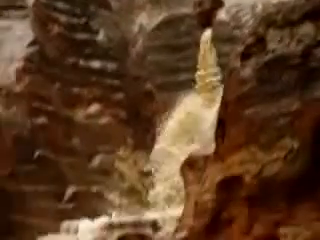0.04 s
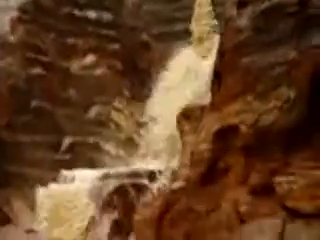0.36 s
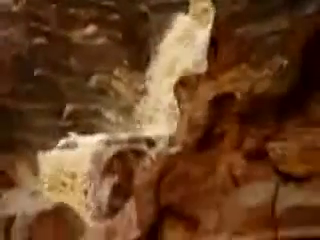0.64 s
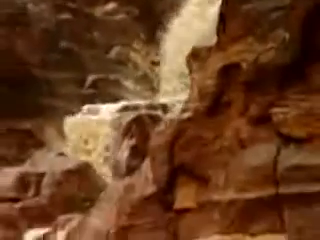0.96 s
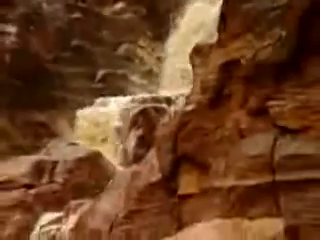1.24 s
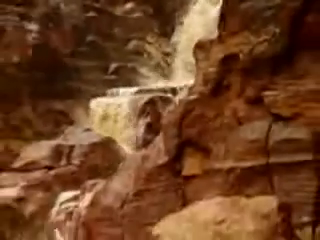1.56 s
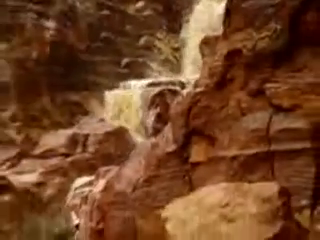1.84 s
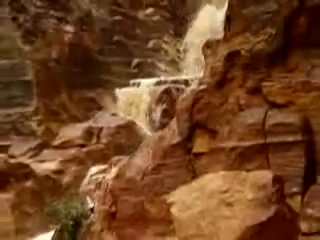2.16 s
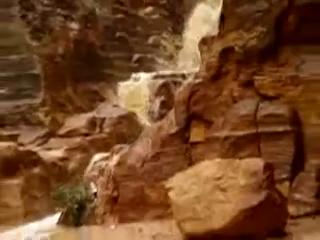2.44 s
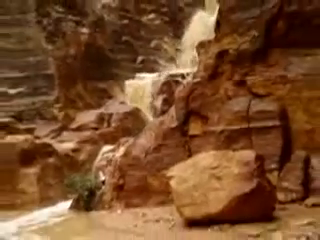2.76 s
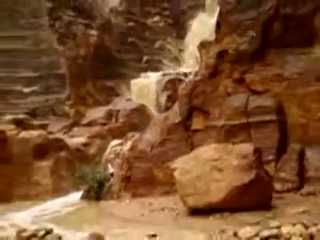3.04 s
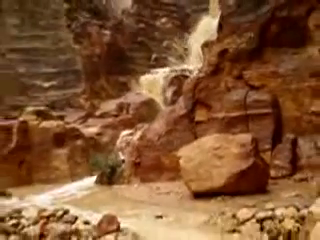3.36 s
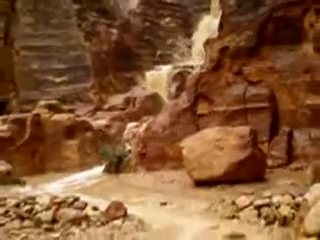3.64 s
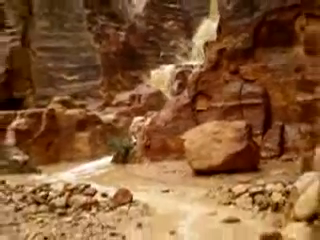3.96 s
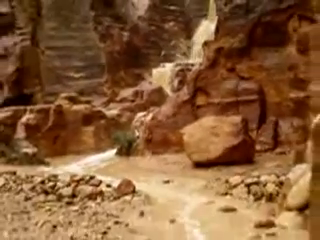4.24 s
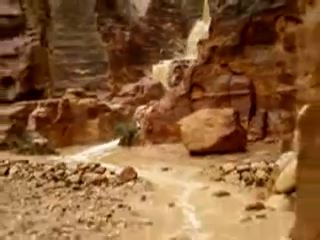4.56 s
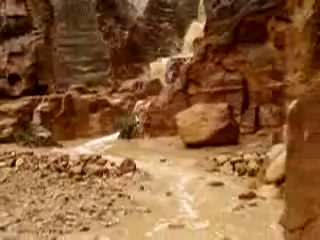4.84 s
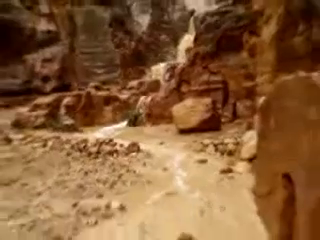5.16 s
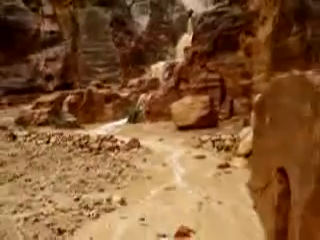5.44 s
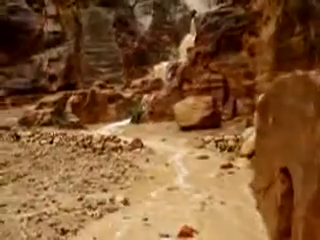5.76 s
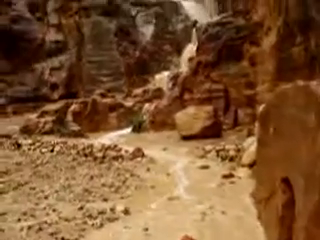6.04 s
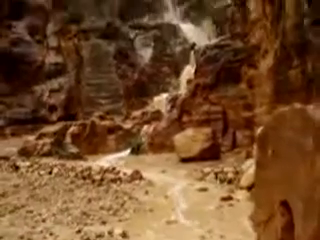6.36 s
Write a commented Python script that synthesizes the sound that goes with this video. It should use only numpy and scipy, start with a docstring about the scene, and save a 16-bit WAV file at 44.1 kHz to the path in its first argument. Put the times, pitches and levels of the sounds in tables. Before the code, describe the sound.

A muddy waterfall pours down a canyon cliff in a dense, steady roar, with softer bubbling and fizzing where it runs off over gravel. A breeze rumbles on the camera microphone, and gusts thump and flutter against it in the first half before easing. Small waves slop near the bank. Late on, an air pocket gives one hollow gulp, then a stone knocks once in the current.

```python
"""A muddy flood waterfall roars down a canyon cliff, heard on a mono camera microphone.
Where the water runs off over a gravel bed, bubbles ring and droplets fizz, smeared by the rock walls.
Right at the microphone a passing breeze rumbles, and a few gusts buffet it. Small waves slop
near the bank; late on, an air pocket gulps in the stream and the current knocks one stone."""
import sys
import numpy as np
from scipy import signal
from scipy.fft import rfft, irfft
from scipy.io import wavfile
from scipy.ndimage import uniform_filter1d

SR = 44100
rng = np.random.default_rng(int(sys.argv[2]) if len(sys.argv) > 2 else 0)


def transcribe(u):
    """Save the signal u as a 16-bit wav file named by the first command-line argument.

    u: samples, shape (n,) or (channels, n), limited to [-1, 1]; the rate is SR.
    q: integer samples, one column per channel.
    """
    v = np.clip(np.atleast_2d(u).T, -1, 1)
    q = np.round(v * 32767).astype(np.int16)
    wavfile.write(sys.argv[1], SR, q)


N = 286650
TIME = np.arange(N) / SR
TOP_HZ = 9200  # the camera's treble limit

# Spectrum of the falls. Each row: frequency in Hz, relative level in dB.
ROAR_SPECTRUM = [(20, -31), (110, -15.5), (160, -5.5), (220, -1.4), (340, -0.4), (480, -1.5), (680, -0.37),
                 (1000, -3.5), (1300, -3.5), (1600, -4.5), (2200, -5), (3200, -9), (3900, -10.5),
                 (5800, -11.5), (7700, -16.5), (9100, -30)]
# Wind on the microphone: its deep rumble, and the flutter of a hard gust.
# Each row: frequency in Hz, relative level in dB.
RUMBLE_SPECTRUM = [(20, -17), (45, -5.5), (80, 4.5), (150, 3), (300, -11.5), (900, -49)]
FLUTTER_SPECTRUM = [(50, -20), (140, 6), (300, 2.5), (480, -6.5), (1000, -45)]
# Gusts on top of the breeze. Each row: arrival in seconds, hold in seconds, level in dB.
GUSTS = [(.04, .02, -32), (.835, .01, -38), (1.076, 0.37, -29), (1.6, .16, -32), (2.14, 0.32, -32),
         (3.32, .06, -38)]
# Single eddies that thump the microphone.
# Each row: centre in seconds, pitch in Hz, envelope level in dB, half length in cycles.
EDDIES = [(.838, 85, -26, 0.72), (1.094, 250, -11.5, .55), (1.109, 175, -9, .44), (1.151, 185, -10, .44),
          (1.227, 185, -13, .6), (1.292, 100, -17, 0.65), (1.314, 200, -16, .8), (1.338, 160, -14, .6),
          (1.391, 220, -11, .6), (1.4, 260, -13, .9), (1.434, 205, -6, .4), (1.474, 200, -16, .8),
          (1.492, 145, -11, 0.92), (1.619, 105, -25, 1.1), (1.715, 105, -25, 1), (2.004, 100, -24, 1.1),
          (2.121, 120, -20, .7), (2.19, 125, -21.5, .8), (2.412, 220, -11.5, 0.65),
          (2.421, 125, -13.5, 0.84), (3.377, 115, -23, .6), (3.846, 75, -31, .7)]
# Slops that stand out of the stream. Each row: centre in seconds, strongest frequency in Hz,
# level in dB, half length in seconds, width in octaves.
SLOPS = [(0.25, 1200, -22, .014, 1), (.825, 5000, -33.5, .032, 0.4), (4.562, 4800, -35.5, .02, .45),
         (4.836, 350, -22.5, 0.014, 1), (5.355, 850, -23.5, 0.024, 1.2), (5.425, 900, -28, .035, 1.2)]
# A stone in the current. One row: centre in seconds, pitch in Hz, envelope level in dB.
STONE_KNOCK = (5.356, 1050, -6.5)


def undb(db):
    """Decibels to gain."""
    return 10 ** (np.asarray(db) / 20)


def unit(x):
    """Scale to rms 1."""
    return x / np.sqrt(np.mean(x ** 2))


def colour(x, spectrum):
    """Filter by a spectrum of (Hz, dB) points."""
    hz, db = np.transpose(spectrum)
    bin_hz = np.maximum(np.fft.rfftfreq(N, 1 / SR), 1)
    return irfft(rfft(x) * undb(np.interp(np.log(bin_hz), np.log(hz), db)), N)


def waver(rate_hz):
    """A smooth random curve of rms 1, heading for a new value rate_hz times a second."""
    hold = max(int(SR / rate_hz), 2)
    steps = np.repeat(rng.standard_normal(N // hold + 1), hold)
    return unit(uniform_filter1d(uniform_filter1d(steps, hold), hold)[:N])


def churn(surge_db, flicker_db, flicker_hz, bands=20):
    """Turbulent noise: all bands surge together and each flickers alone."""
    spectrum = rfft(rng.standard_normal(N))
    surge = surge_db * waver(2.9)
    band_of_bin = np.searchsorted(np.geomspace(100, TOP_HZ, bands), np.fft.rfftfreq(N, 1 / SR))
    noises = (irfft(spectrum * (band_of_bin == k), N) for k in range(bands))
    return unit(sum(noise * undb(surge + flicker_db * waver(flicker_hz)) for noise in noises))


def falls(spray_rise_db):
    """Countless impacts under the cliff merge into a steady roar; its top follows the spray."""
    water = unit(colour(churn(surge_db=-0.2, flicker_db=.5, flicker_hz=18), ROAR_SPECTRUM))
    body = signal.sosfiltfilt(signal.butter(2, 2500, fs=SR, output="sos"), water)
    spray = water - body
    return body * undb(-18.5) + spray * undb(-19.5 + spray_rise_db)


def rings(low_hz, high_hz, cycles, glide, spread_db, count, samples=1024):
    """A cloud of small damped rings that rise in pitch; most are faint, a few stand out."""
    when, pitch, strength, life = rng.random((count, 4)).T[:, :, None]
    hz = low_hz * (high_hz / low_hz) ** pitch
    turns = hz * np.arange(samples) / SR
    age = turns / (cycles * (.5 + life))  # 1 when the ring has fallen 40 dB
    gain = undb(-spread_db * np.log(np.maximum(1 - strength, .01)))
    rise = 1 + glide * np.minimum(age, 2) / 2
    ring = gain * np.exp(-np.log(100) * age) * np.sin(2 * np.pi * turns * rise)
    places = (when * N).astype(int) + np.arange(samples)
    return unit(np.bincount(places.ravel(), ring.ravel(), N)[:N])


def canyon(x, t60_s, wet_db):
    """The direct sound reaches the microphone first, then a dense decay from the rock walls."""
    tail = rng.standard_normal(N) * np.exp(-np.log(1000) * TIME / t60_s) * (TIME > .02)
    reflections = signal.fftconvolve(x, tail / np.linalg.norm(tail))[:N]
    return unit(x + undb(wet_db) * reflections)


def runoff(spray_rise_db):
    """Bubbles ring where the stream folds over the gravel; droplets fizz above in uneven spurts."""
    bubbles = rings(450, 2510, cycles=12, glide=.19, spread_db=2.5, count=3000)
    droplets = rings(2080, 7050, cycles=6, glide=.1, spread_db=7.5, count=16000, samples=128)
    gurgle = canyon(bubbles, t60_s=.87, wet_db=-7) * undb(-33.5)
    fizz = canyon(droplets, t60_s=.19, wet_db=-5) * undb(-50.5 + spray_rise_db + 2.2 * waver(11))
    return gurgle + fizz


def gust(arrival_s, hold_s, attack_s=.035, release_s=.064):
    """The envelope of one gust: it builds quickly, holds and dies away."""
    early = np.maximum(arrival_s - TIME, 0)
    late = np.maximum(TIME - arrival_s - hold_s, 0)
    return np.exp(-early / attack_s - late / release_s)


def wind(peak_s=2.2, slope_db_per_s=3.5, hard_gust_db=-29.5):
    """A breeze rises and dies away, rumbling on the microphone; hard gusts flutter higher."""
    breeze = undb(-37.5 - slope_db_per_s * np.abs(TIME - peak_s) + waver(6.6))
    gust_power = sum((undb(db) * gust(arrival_s, hold_s)) ** 2 for arrival_s, hold_s, db in GUSTS)
    force = np.sqrt(breeze ** 2 + gust_power)
    rumble = unit(colour(rng.standard_normal(N), RUMBLE_SPECTRUM) * undb(.76 * waver(35)))
    flutter = unit(colour(rng.standard_normal(N), FLUTTER_SPECTRUM) * undb(2 * waver(35)))
    flutter_share = 1 / (1 + (undb(hard_gust_db) / force) ** 3)  # small, fast eddies
    return (np.sqrt(1 - flutter_share) * rumble + np.sqrt(flutter_share) * flutter) * force


def slops():
    """Small waves collapse near the bank: broad splashes, or narrow bright spurts of spray."""
    splashes = np.zeros(N)
    for centre_s, hz, db, half_s, octaves in SLOPS:
        corners_hz = hz * 2.0 ** (octaves * np.array([-2, 0, 1, 3]))
        spectrum = list(zip(corners_hz, [-30, 0, -10, -45]))
        splash = unit(colour(rng.standard_normal(N), spectrum))
        splashes += splash * undb(db) * np.exp(-((TIME - centre_s) / half_s) ** 2)
    return splashes


def pulse(centre_s, hz, db, half_cycles):
    """A brief pressure swing: suction, then a push."""
    turns = (TIME - centre_s) * hz
    return undb(db) * np.sin(2 * np.pi * turns) * np.exp(-(turns / half_cycles) ** 2)


def eddies():
    """Each large eddy in the wind thumps the microphone once."""
    return sum(pulse(*eddy) for eddy in EDDIES)


def gulp(centre_s=4.853, hz=606, rise_hz_per_s=1200, half_s=.022):
    """A large air pocket gives a hollow, wavering ring that rises in pitch as it surfaces."""
    offset_s = TIME - centre_s
    turns = hz * offset_s + rise_hz_per_s * offset_s ** 2 / 2
    envelope = np.exp(-(offset_s / half_s) ** 2)
    return np.sin(2 * np.pi * turns) * envelope * undb(-22 + 1.2 * waver(120))


def stone():
    """A stone rolled by the current gives one sharp knock."""
    return pulse(*STONE_KNOCK, half_cycles=.48)


def scene():
    """Water in the canyon and wind at the microphone, the same in both channels."""
    spray_rise_db = .14 * TIME  # the spray brightens a little as the microphone turns to the run-off
    mono = falls(spray_rise_db) + runoff(spray_rise_db) + wind() + slops() + eddies() + gulp() + stone()
    return np.array([mono, mono])


def record(dry):
    """The camera thins the deepest bass and cuts the top steeply."""
    thinned = signal.sosfilt(signal.butter(1, 15, "high", fs=SR, output="sos"), dry)
    return signal.sosfilt(signal.ellip(10, .2, 80, TOP_HZ, fs=SR, output="sos"), thinned)


dry = scene()
out = record(dry)
transcribe(out)
```